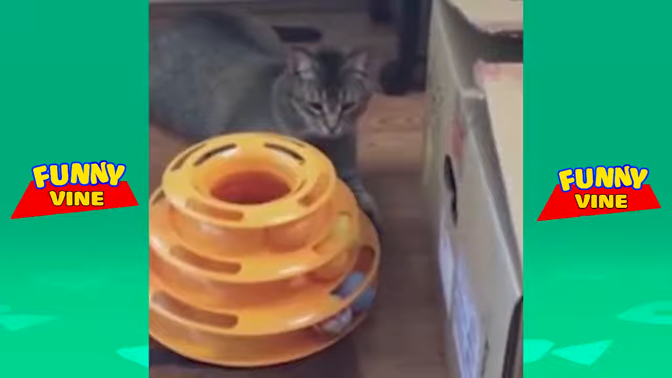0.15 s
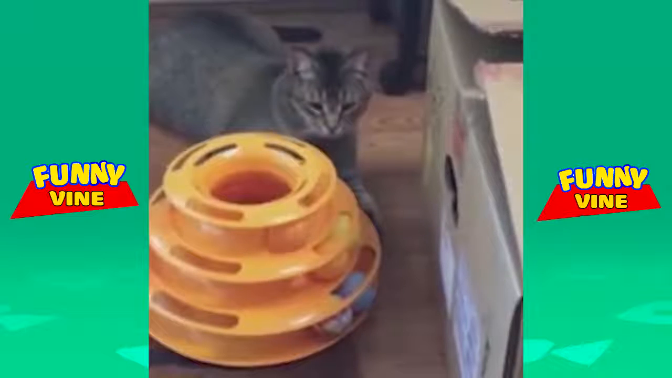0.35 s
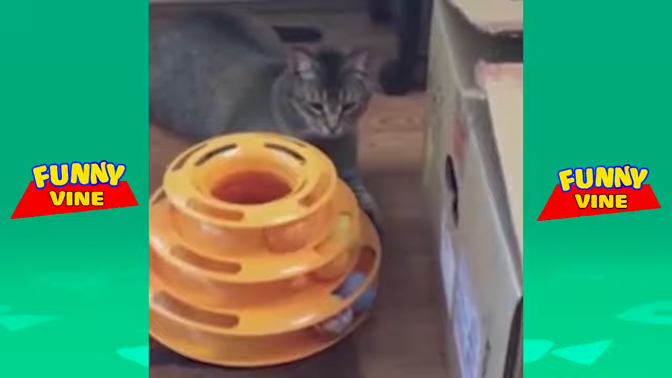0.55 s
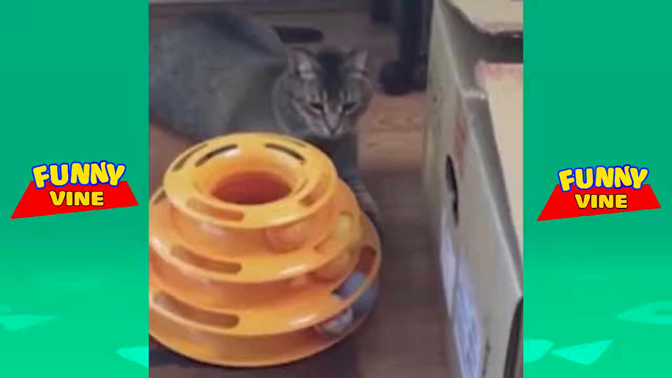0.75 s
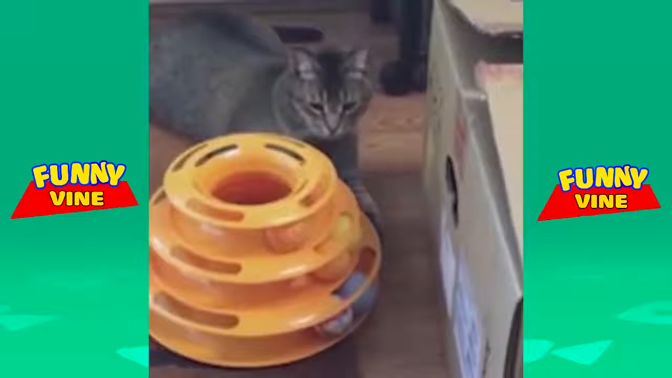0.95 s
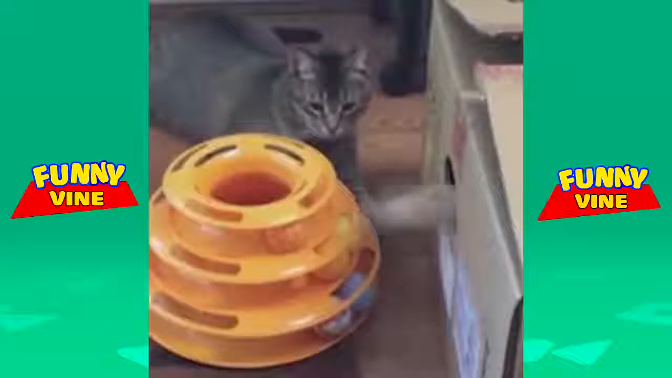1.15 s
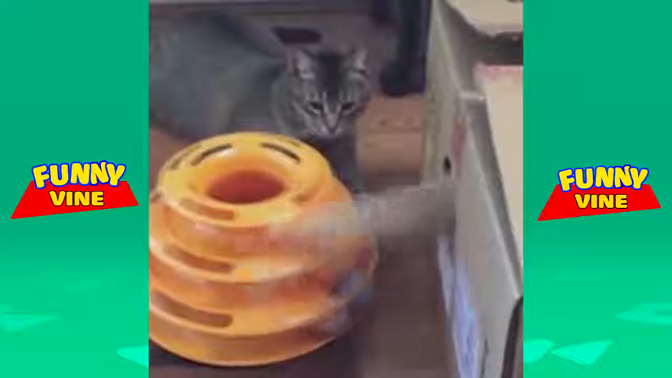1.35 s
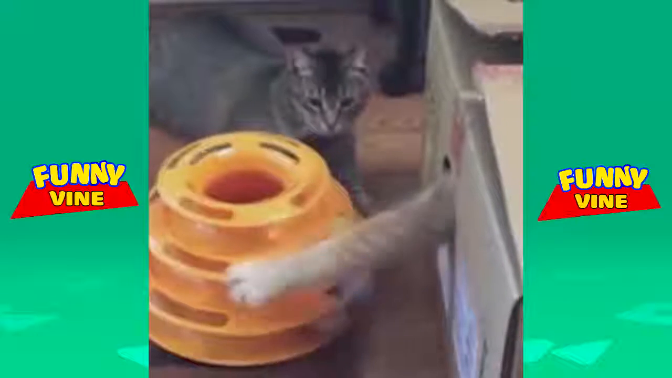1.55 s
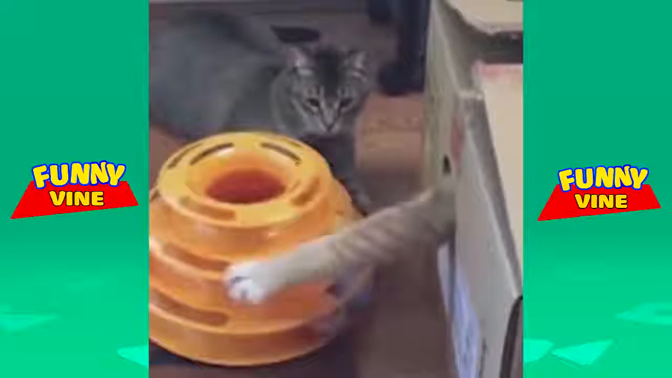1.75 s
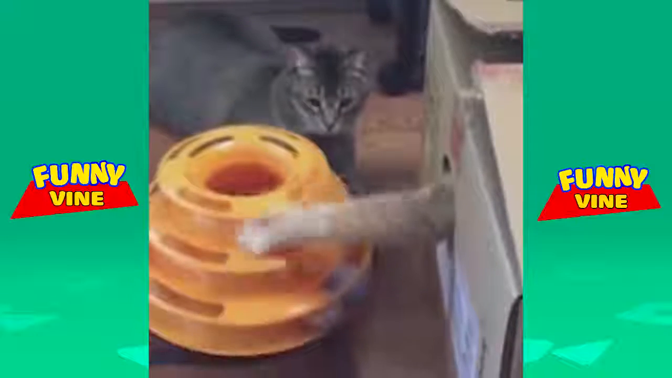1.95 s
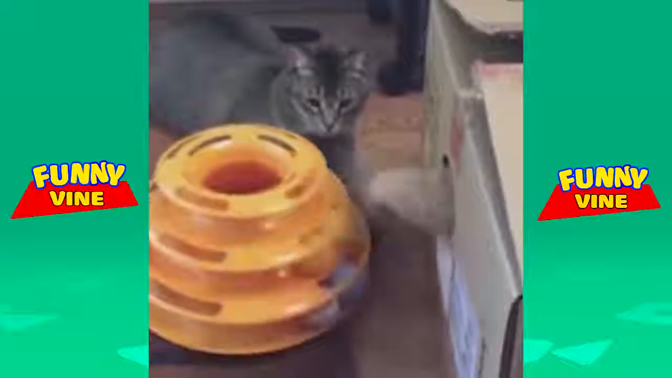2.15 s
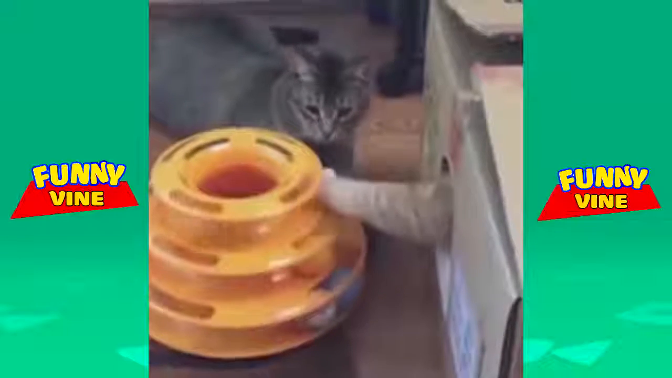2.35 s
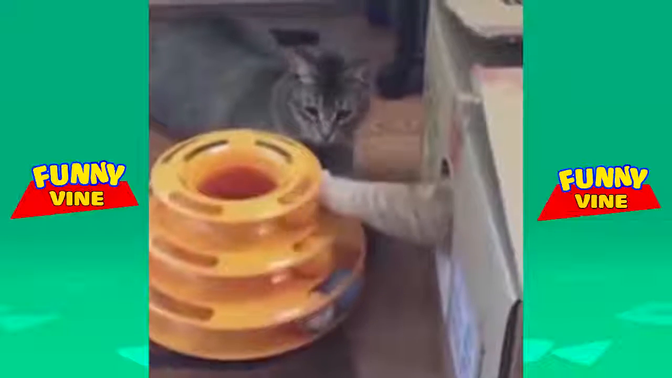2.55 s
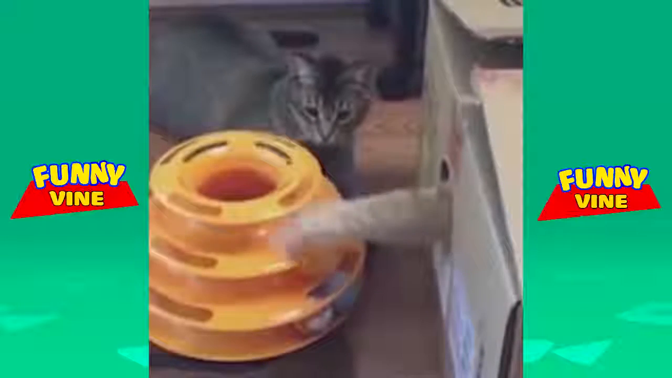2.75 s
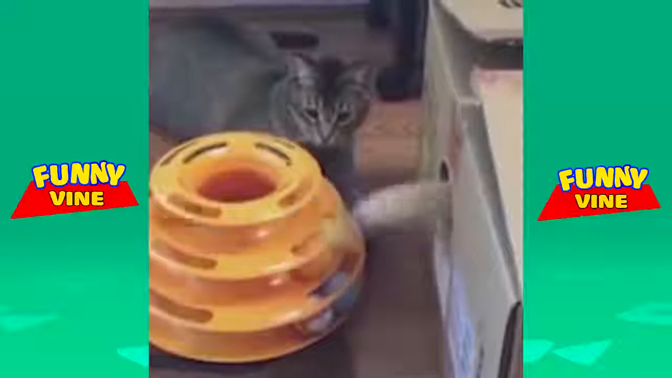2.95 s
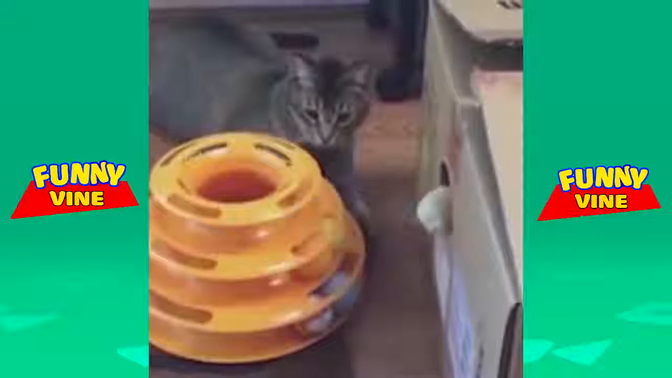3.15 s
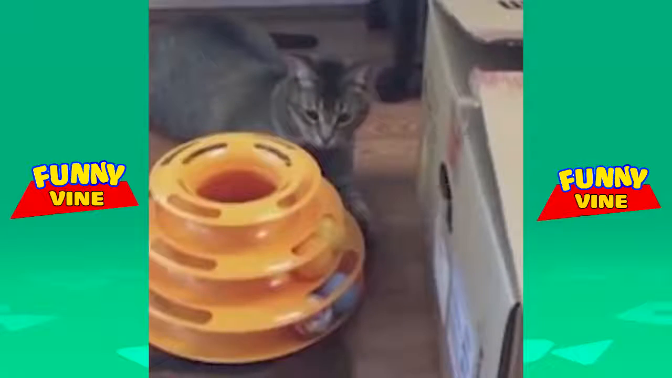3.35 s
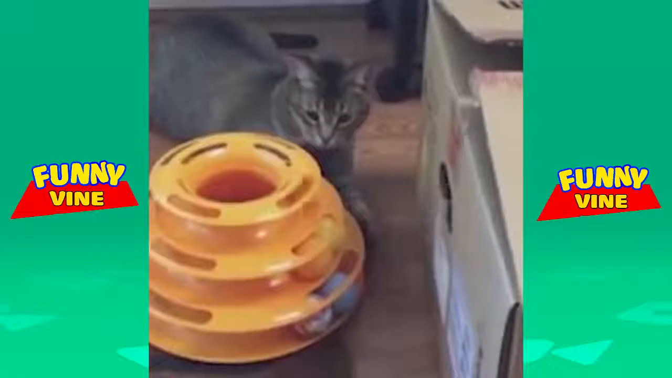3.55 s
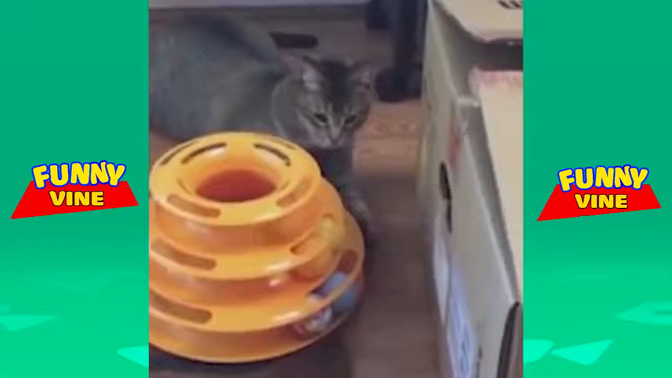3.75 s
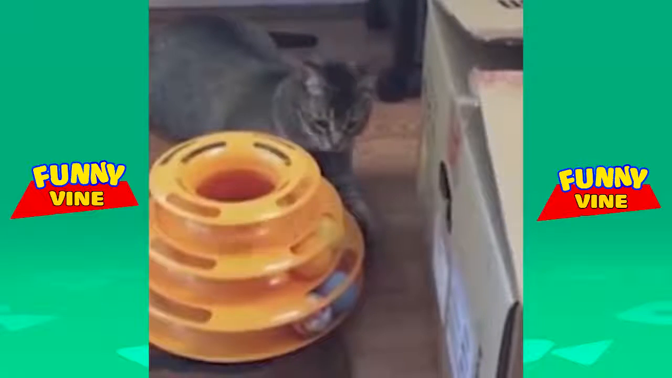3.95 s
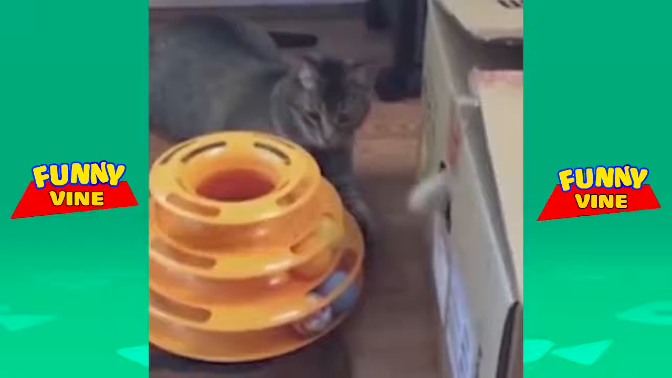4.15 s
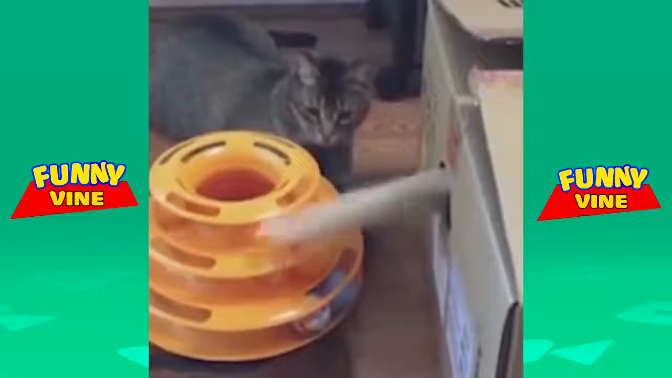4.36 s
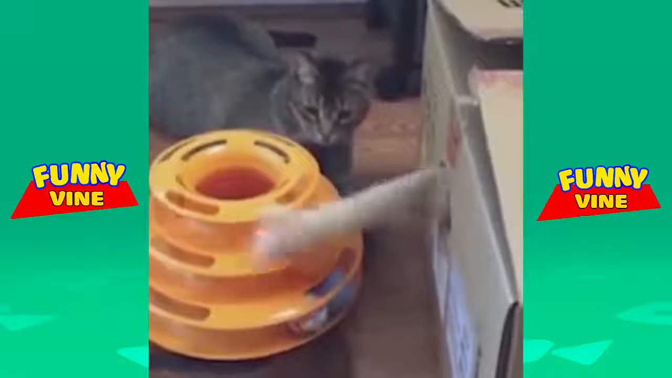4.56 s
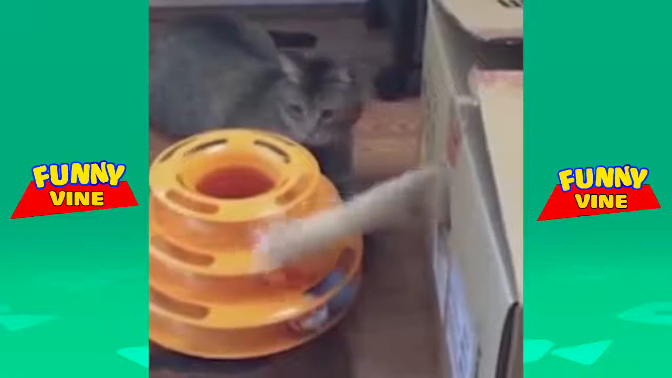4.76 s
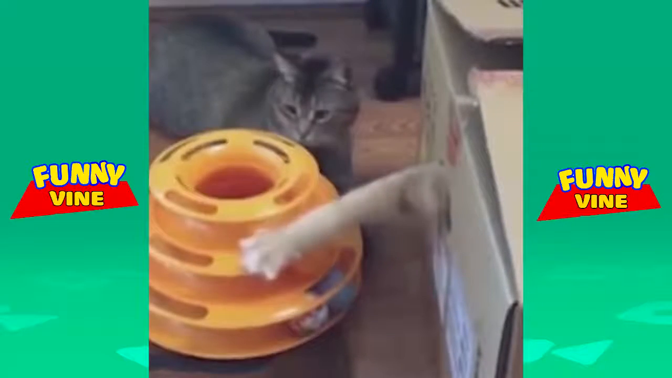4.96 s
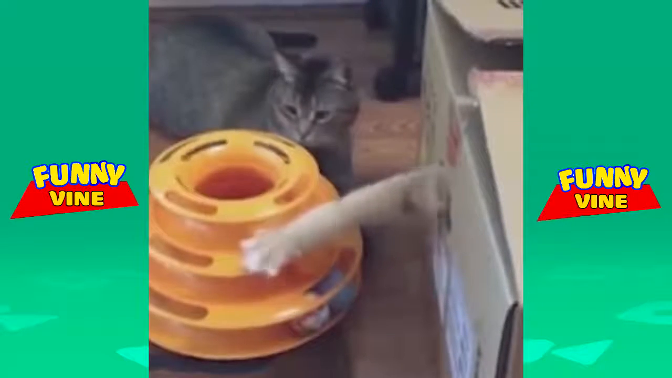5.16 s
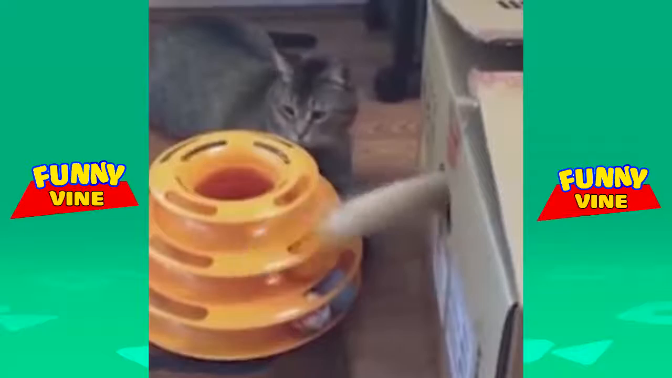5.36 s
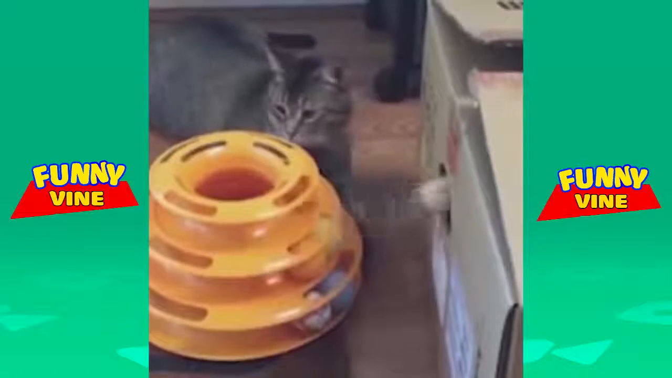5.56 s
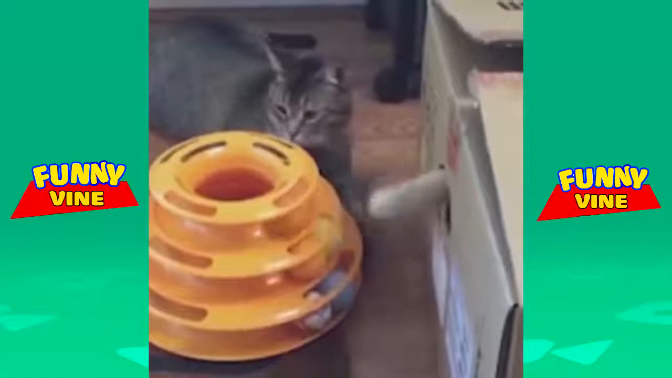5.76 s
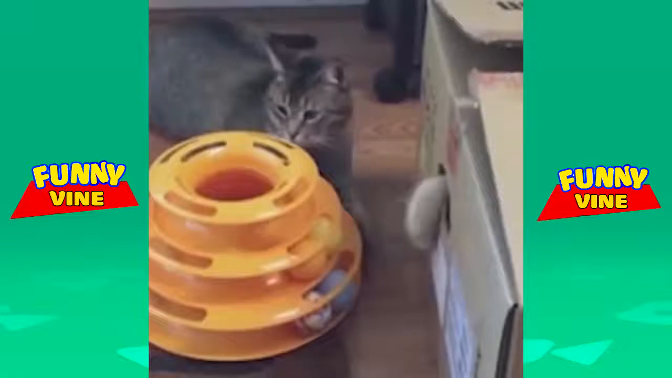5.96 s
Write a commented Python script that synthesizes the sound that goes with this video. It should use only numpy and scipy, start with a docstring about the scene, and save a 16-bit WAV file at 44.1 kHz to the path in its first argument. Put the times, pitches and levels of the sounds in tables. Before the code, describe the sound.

For the first 1.3 seconds there is little but soft room noise and a faint low hum, swelling slightly until about 1.0, then dropping at once; a very light brush comes near 0.75. At about 1.45 a dull thud and a sharp hollow plastic clack begin a cat's batting: balls knock and rattle in their tracks, with claw skids near 1.7. Knocks ease around 2.1, then crowd together loudly from 2.25 to 2.65. Another cluster comes at 2.9 to 3.0, followed by rolling, scrapes near 3.3 and a clack at 3.63. Faint ticks and rolling fill 3.8 to 4.4. A second bout starts at 4.5, strong to 4.65, with scuffs and thuds, thinning through 5.4. Quiet fur brushing and claw scratches follow at 5.55 to 6.0, and a final clear knock lands near 6.08. Close phone pickup, small echoing room.

```python
"""Small room, wooden floor: a cat's paw shoots out of a cardboard box and bats a plastic tower of ring tracks.
Hollow balls knock and roll (modal track and shell, driven by random contacts); claws skid on the plastic.
Tower and box thud (damped modes) and shift on the boards (resonant scuffs); fur brushes (grainy band hiss).
Room echoes, shaped noise and a faint appliance hum lie behind; a phone a step away narrows the band."""
import sys
import numpy as np
from scipy import signal
from scipy.fft import rfft, irfft
from scipy.io import wavfile
from scipy.ndimage import uniform_filter1d

SR = 44100
rng = np.random.default_rng(int(sys.argv[2]) if len(sys.argv) > 2 else 0)


def wav_record(signal):
    """Record a signal, one row per channel, as 16-bit PCM in the file named by sys.argv[1]."""
    frames = np.transpose(np.atleast_2d(signal))
    bounded = np.clip(frames, -1, 1)
    # unit amplitude maps onto the largest positive 16-bit level
    quanta = np.round(bounded * 32767).astype(np.int16)
    wavfile.write(sys.argv[1], SR, quanta)


N = 268774

# Knocks of balls and claws, dry peaks: [t/s, track/dB, shell/dB, crack/dB, favoured track f/Hz, favoured shell f/Hz]
KNOCK_EVENTS = [(1.456, -24, -43, -43, 388, 1760), (1.474, -32, -31, -37, 587, 2960),
                (1.500, -9.5, -14, -22.5, 680, 1850), (1.513, -31, -34, -47, 725, 1800),
                (1.530, -30, -40, -49, 600, 1800), (1.567, -38, -22, -18, 662, 2280),
                (1.615, -19, -19.5, -27, 1110, 1740), (1.72, -32, -18, -24, 630, 1810),
                (1.739, -21, -20, -31, 704, 1850), (1.767, -23, -20, -40, 630, 1720),
                (1.773, -29, -25, -43, 420, 3400), (1.783, -27, -36, -50, 400, 1800),
                (1.833, -31, -21, -32, 1190, 1570), (1.877, -53, -16, -37, 630, 1670),
                (1.894, -45, -19, -44, 600, 2980), (1.909, -24.5, -16, -45, 600, 1640),
                (1.940, -21.5, -18.5, -49, 643, 2640), (2.036, -27, -31, -50, 646, 2700),
                (2.078, -33, -50, -54, 655, 1800), (2.117, -40, -36.5, -60, 637, 3130),
                (2.166, -31.5, -48, -51, 780, 1650), (2.187, -23.5, -18.5, -60, 590, 1800),
                (2.263, -43, -23, -23, 1200, 1870), (2.276, -30, -8.5, -31, 530, 2000),
                (2.288, -16.5, -23, -23.5, 520, 1800), (2.305, -19, -29, -29, 586, 1510),
                (2.316, -14, -12, -40, 570, 3220), (2.330, -29, -34, -47, 607, 1910),
                (2.352, -24, -19.5, -32, 640, 2170), (2.412, -40, -15.5, -33, 1170, 1700),
                (2.425, -13, -12, -19.5, 840, 1500), (2.434, -15.5, -14, -37, 580, 1570),
                (2.449, -39, -13.5, -27.5, 537, 2270), (2.479, -25.5, -21, -35, 407, 1700),
                (2.595, -30, -31, -50, 620, 3500), (2.605, -47, -28, -39, 616, 1980),
                (2.62, -47, -15, -46, 616, 3630), (2.627, -18, -16, -52, 724, 1560),
                (2.67, -30, -25.5, -55, 520, 3330), (2.865, -30, -59, -50, 730, 1510),
                (2.909, -55, -32, -43, 600, 3300), (2.92, -17.5, -14.5, -31, 1060, 2980),
                (2.947, -42, -20, -30, 1140, 2030), (2.986, -15.5, -13, -26, 890, 1900),
                (3.009, -23.5, -13.5, -55, 523, 1620), (3.035, -35, -29, -53, 420, 1800),
                (3.129, -48, -34, -46, 623, 1400), (3.168, -41, -34.5, -53, 620, 1900),
                (3.186, -38, -38, -48, 850, 1800), (3.245, -37, -43, -45, 627, 2000),
                (3.329, -24.5, -28, -35, 690, 1770), (3.365, -33, -32, -44, 617, 1850),
                (3.631, -53, -13, -28, 685, 1700), (3.802, -36, -24.5, -35.5, 1210, 2800),
                (3.809, -40, -29, -50, 1270, 2090), (3.818, -36, -30, -56, 1210, 2980),
                (3.934, -34, -38.5, -60, 615, 1850), (3.96, -32, -36, -73, 620, 1730),
                (4.016, -36.5, -45, -71.5, 524, 1730), (4.09, -37, -52, -73, 625, 1330),
                (4.121, -34, -46, -62, 595, 1310), (4.37, -35, -45, -69, 464, 1650),
                (4.499, -14, -17.5, -30.5, 684, 2140), (4.52, -26, -40, -50, 372, 1800),
                (4.564, -17, -21, -28, 726, 1790), (4.571, -39, -12, -45, 727, 1750),
                (4.577, -24, -14, -47, 504, 1830), (4.592, -36, -29, -41, 700, 2900),
                (4.617, -34, -26, -46, 625, 1800), (4.642, -20.5, -30, -30, 760, 1810),
                (4.709, -26, -40, -32, 710, 1690), (4.787, -27, -39, -45, 690, 1800),
                (4.816, -36, -18, -32.5, 708, 2180), (4.903, -32, -39, -60, 617, 1900),
                (4.929, -51, -27, -48, 625, 3100), (4.956, -28.5, -39, -56, 630, 1750),
                (4.967, -37, -25.5, -28, 650, 1750), (4.991, -26, -16, -35, 680, 1980),
                (5.008, -55, -39, -52, 650, 2150), (5.032, -55, -24.5, -58, 630, 1780),
                (5.063, -28, -48, -63, 597, 1780), (5.129, -26.5, -30, -59, 1020, 1820),
                (5.14, -29, -39, -61, 515, 1330), (5.159, -49, -36, -60, 603, 1840),
                (5.192, -26, -30, -29.5, 494, 1820), (5.205, -29.5, -36, -55, 520, 1750),
                (5.216, -46, -44, -53, 610, 1750), (5.242, -44, -57, -45, 406, 2360),
                (5.3, -38.5, -45, -68, 600, 1700), (5.382, -24.5, -43, -68, 392, 1350),
                (5.389, -32, -34, -68, 400, 1320), (5.4, -32, -30.5, -60, 1220, 1760),
                (5.411, -38, -43, -64, 585, 1350), (5.842, -43, -46, -48, 706, 1980),
                (6.027, -38.5, -47, -60, 1092, 1305), (6.076, -18, -23, -35, 690, 1940)]
# Claws skidding on plastic, dry peaks: [t/s, track/dB, shell/dB, crack/dB, favoured track f/Hz, favoured shell f/Hz]
SKID_EVENTS = [(1.676, -23, -31, -47, 635, 1750), (1.734, -23, -16.5, -21, 710, 2000),
               (2.597, -23.5, -18.5, -51, 686, 2160), (3.237, -32, -33.5, -31, 704, 2000),
               (3.321, -32, -33, -41, 695, 1690), (3.617, -28.5, -23, -31, 625, 2880),
               (4.765, -21.5, -24.5, -29, 678, 1940), (5.555, -37, -43.5, -58, 614, 1300),
               (5.693, -45, -60, -45, 704, 2860), (5.770, -41.5, -32, -45, 690, 1920),
               (5.836, -34.5, -41, -36.5, 720, 1950), (5.875, -35, -28, -36, 685, 2830),
               (5.885, -32.5, -24.5, -29.5, 700, 1990), (5.98, -65.5, -75, -38.5, 672, 1800),
               (6.067, -25, -53, -32, 700, 1300)]
# Runs of a shoved ball: [start t/s, free run/s, track level/dB, shell level/dB]
ROLL_EVENTS = [(1.575, 0.04, -36, -40), (1.62, 0.027, -45, -47), (1.76, 0.022, -37, -30),
               (1.95, 0.36, -55, -48), (2.31, 0.11, -56, -30), (2.45, 0.012, -55, -34.5),
               (2.541, 0.14, -44, -39.5), (2.9, .5, -46, -49.5), (3.43, 0.33, -48.5, -55.5),
               (3.849, 0.55, -54.5, -74), (4.44, 0.027, -46.5, -53), (4.64, 0.11, -43, -41),
               (4.82, 0.34, -53, -53), (5.18, 0.01, -43.5, -49), (5.35, 0.3, -54.5, -62.5),
               (5.74, 0.091, -52.5, -48.5), (5.87, 0.016, -61, -48), (5.92, 0.067, -71, -61),
               (6.08, 0.039, -39.5, -70)]
# Thuds of tower and box, dry peaks: [t/s, level/dB, nominal f/Hz, t60/s]
THUD_EVENTS = [(1.408, -56, 243, 0.031), (1.463, -19, 183, 0.076), (1.485, -28.5, 169, 0.097),
               (2.191, -36.5, 149, 0.21), (2.286, -24.5, 214, 0.022), (2.415, -27.5, 153, 0.043),
               (2.579, -24, 157, 0.15), (2.881, -51, 139.4, 0.12), (2.963, -45, 166, 0.11),
               (3.067, -31.5, 154, 0.082), (3.328, -29.5, 203, 0.091), (3.646, -33.5, 136, 0.14),
               (3.809, -37.5, 169, 0.14), (4.441, -29, 182, 0.21), (4.57, -25.5, 243.5, 0.2),
               (4.643, -22.5, 177, 0.07), (4.734, -33.5, 162, 0.096), (4.97, -23.5, 169, 0.066),
               (5.176, -32, 162, 0.061), (5.365, -35.5, 321, 0.095), (5.568, -38.5, 148, 0.11),
               (5.794, -36, 179, 0.1), (6.034, -28.5, 171, 0.046)]
# Strokes of fur and claws: [loudest t/s, relative level/dB, swell/s, hold/s, tilt/(dB per octave)]
BRUSH_STROKES = [(0.76, -53, 0.012, 0.0048, 3), (1.336, -49, 0.015, 0.018, 1.5),
                 (1.478, -39.5, 0.0077, 0.013, -5.5), (1.5, -49, 0.016, 0.0071, -15),
                 (1.53, -45, .03, 0.033, -7), (1.568, -37.5, 0.0065, 0.06, -4.5),
                 (1.69, -36, 0.018, 0.042, 0), (1.749, -37.5, 0.06, 0.022, -13.5),
                 (1.88, -41.5, 0.074, 0.054, 5), (2.2, -53, 0.041, 0.055, -7),
                 (2.264, -38, 0.011, 0.044, -8), (2.38, -45, 0.057, 0.027, -2),
                 (2.413, -40, 0.014, .01, 24), (2.427, -43, 0.013, 0.0073, 26),
                 (2.47, -44, 0.081, 0.065, -10.5), (2.609, -45, 0.071, 0.044, -9),
                 (2.72, -71, .05, .17, 19), (2.922, -47.5, 0.013, 0.0041, 40),
                 (2.947, -47.5, 0.024, 0.014, -15), (2.987, -41.5, 0.0088, 0.012, 22),
                 (3.08, -46, 0.036, 0.14, 7), (3.244, -38, 0.072, 0.029, 5),
                 (3.326, -35.5, 0.03, 0.0042, 1.5), (3.38, -48, 0.054, 0.16, 1.5),
                 (3.626, -49, 0.019, 0.0067, -14), (3.804, -50.5, 0.039, 0.0084, -2),
                 (4.38, -56, 0.057, .05, 5), (4.45, -40.5, 0.015, 0.016, 4.5),
                 (4.502, -45, 0.017, 0.0042, 4), (4.567, -43, 0.02, 0.017, -14),
                 (4.645, -45.5, 0.066, 0.1, 0), (4.74, -36.5, 0.13, 0.048, -0.5),
                 (4.85, -69, .05, 0.12, -18), (4.966, -51.5, 0.063, 0.01, -11.5),
                 (4.992, -52.5, 0.024, 0.011, -18.5), (5.135, -59, 0.099, 0.045, -1),
                 (5.195, -46.5, 0.041, 0.011, 3), (5.27, -58.5, .05, 0.055, 7), (5.39, -64.5, .06, .15, 6),
                 (5.567, -46.5, 0.021, 0.11, 3), (5.7, -41.5, 0.02, 0.22, 2.5),
                 (5.889, -48.5, 0.058, 0.0032, -5), (5.998, -64, .03, 0.0044, -8),
                 (6.072, -40.5, 0.031, 0.0044, 4)]
# Jolts of tower base and box on the boards: [t/s, level/dB]
SHIFT_JOLTS = [(1.54, -36.5), (1.61, -47), (1.7, -39), (2.2, -50), (2.37, -43), (2.53, -43), (3.05, -47),
               (3.15, -48.5), (3.27, -44.5), (3.5, -63), (3.65, -48), (3.78, -44.5), (3.95, -60),
               (4.1, -52), (4.35, -57), (4.469, -38.5), (4.64, -33), (5.05, -50), (5.25, -56), (5.6, -49),
               (5.75, -49), (5.85, -45)]
# Hollow track modes: [nominal f/Hz, relative level/dB, t60/s when struck]
TRACK_MODES = [(384, -3, 0.12), (404.7, -1.5, 0.18), (454, -5, 0.14), (518, 0, 0.21), (590, 0.5, 0.049),
               (629, 4.5, 0.071), (699.4, 8.5, 0.074), (801, -5, 0.076), (856, 4, 0.071), (945.6, 2, 0.13),
               (1110, 9, 0.033), (1177, 3, 0.089)]
# Ball shell modes: [nominal f/Hz, relative level/dB, t60/s when struck]
SHELL_MODES = [(1303, 0.5, 0.039), (1472, -2, 0.037), (1730, 0.5, 0.035), (1815, 1.5, 0.032),
               (1959, 6.5, 0.02), (2187, 2.5, 0.042), (2606, -4.5, 0.026), (2770, 7.5, 0.0074),
               (3280, 6.5, 0.016), (3550, -12, 0.02), (4560, -6, 0.0088), (5214, -13, 0.012)]
# Low resonances of boards and box: [f/Hz, width/Hz, relative level/dB]
BOARD_BANDS = [(64.6, 39, -18), (95, 50, -25.5), (126, 14.5, 10.5), (159, 35, 10), (205, 34, -11),
               (233, 8.3, -3)]
# Broad resonances of brush hiss and contact crack: [f/Hz, width/Hz, relative level/dB]
FUR_BANDS = [(2825, 860, 4), (4120, 870, -1.5), (5640, 1300, -1.5), (6430, 2600, -6.5), (8510, 810, -7),
             (10400, 4300, -21), (12200, 1200, -39)]
# Mean room noise level; dips briefly, swells, drops at once: [t/s, level/dB]
AIR_LEVELS = [(0, -56), (.07, -64), (.095, -73), (.12, -61.5), (.6, -60.5), (.82, -56.5), (.9, -53.5),
              (1.015, -52.5), (1.022, -66.5), (1.4, -58.5), (1.5, -54), (6.1, -57.5)]
# Room noise spectrum shape: [f/Hz, relative level/dB]
AIR_SPECTRUM = [(15, -60), (25, -2), (71, -2), (118, -3), (150, -4), (202, -19), (335, -14.5), (515, -22),
                (604, -17.5), (1390, -21.5), (1860, -22), (2180, -27.5), (12100, -39.5), (15000, -64)]
# Hum harmonics: [multiple of the hum pitch, relative level/dB]
HUM_HARMONICS = [(1, -68), (2, -73.5), (3, -80.5), (4, -75)]

KNOCK_SWELL_MS, KNOCK_CHATTER_MS, SKID_SWELL_MS, SKID_CHATTER_MS = 0.84, 14.5, 10.14, 8.2
SECOND_TOUCH_MS = 1.296  # longest-to-shortest gap is 1.5 to 0.5 of this
WAVER_RATIO, WAVER_HZ = .04, 16  # spread of pitch waver; median rate
ROLL_RISE_DB_S, ROLL_STOP_DB_S = 235, 118
TRACK_SAG_DB_S, SHELL_SAG_DB_S = 2, 16.5  # a slowing ball loses its shell tone first
BRUSH_SWELL_DB, BRUSH_SAG_DB_S, BRUSH_LIFT_DB_S = 15.5, 42, 331
SHIFT_RISE_DB_S, SHIFT_SETTLE_DB_S = 163, 74
HUM_START_HZ, HUM_SAG_HZ_S = 82.8, .7
ROOM_DB, ROOM_T60_S, ROOM_TREBLE_T60_S = -8, 0.37, 0.26
PHONE_TOP_HZ = 15600


def knocks():
    """A double blow, then sparse rebounds."""
    return clatter(KNOCK_EVENTS, 1, 0.18, KNOCK_SWELL_MS, KNOCK_CHATTER_MS, density=.05)


def skids():
    """Claws catch and slip: a denser chatter without the blow, swelling before it fades."""
    return clatter(SKID_EVENTS, 0, 0.54, SKID_SWELL_MS, SKID_CHATTER_MS, density=0.18)


def clatter(events, blow, rebound, swell_ms, chatter_ms, density):
    """Contacts ring the ball shell and, with a longer push, the track; they also crack directly."""
    out, ms = np.zeros(N), 1000 * np.arange(SR // 7) / SR
    shape = np.minimum(ms / swell_ms, 1) ** 2 * np.exp(-np.maximum(ms - swell_ms, 0) / chatter_ms)
    for s, track_db, shell_db, crack_db, track_hz, shell_hz in events:
        touches = rng.standard_normal(len(ms)) * (rng.random(len(ms)) < density)
        push = rebound * shape * touches
        push[0] = 0.49 * blow
        gap_ms = SECOND_TOUCH_MS * (.5 + rng.random())
        push[int(SR * gap_ms / 1000)] += blow
        scrape = shape * rng.standard_normal(len(ms))
        crack = bands(1.04 * push + 0.14 * scrape, FUR_BANDS)
        track = struck(soften(push, 0.78), TRACK_MODES, track_hz, focus_db=19.0, detune=0.017, spread_db=4.5)
        shell = struck(soften(push, 0.24), SHELL_MODES, shell_hz, focus_db=12.5, detune=0.06, spread_db=5.0)
        crack = crack / np.abs(crack).max()
        add(out, s, undb(track_db) * track + undb(shell_db) * shell + undb(crack_db) * crack)
    return out


def struck(push, modes, spot_hz, focus_db, detune, spread_db):
    """The spot struck favours modes near one pitch; pitch and share vary per blow and waver as the ball moves on."""
    chance = rng.standard_normal((len(modes), 4))
    t, y = np.arange(len(push)) / SR, 0
    for (hz, db, t60_s), (share, offset, depth, pace) in zip(modes, chance):
        octaves = abs(np.log2(hz / spot_hz))
        waver = WAVER_RATIO * depth * np.sin(2 * np.pi * WAVER_HZ * undb(3 * pace) * t)
        pitch_hz = hz * (1 + detune * offset * min(0.27 + 3 * octaves, 1.5) + waver)
        mode_db = db - focus_db * octaves + spread_db * share
        y = y + undb(mode_db) * gliding_ring(push, pitch_hz, t60_s)
    return y / np.abs(y).max()


def rolling():
    """Seams and dust under the balls tick into track and shell; pitches and shares wander as the balls travel."""
    s, run_s, track_db, shell_db = np.transpose(ROLL_EVENTS)
    grit = ticks(1100, scatter_db=2.8) * undb(2.5 * walk(40))
    track = rattle(grit, TRACK_MODES, 0.7, 0.36)
    shell = rattle(grit, SHELL_MODES, 0.4, 0.55)
    track_power = swells(s, track_db, ROLL_RISE_DB_S, run_s, TRACK_SAG_DB_S, ROLL_STOP_DB_S)
    shell_power = swells(s, shell_db, ROLL_RISE_DB_S, run_s, SHELL_SAG_DB_S, ROLL_STOP_DB_S)
    return gain(track_power) * track + gain(shell_power) * shell


def rattle(grit, modes, contact_ms, evenness):
    """Steady ticks ring shorter modes; evenness (below 1) moderates the stretched level contrast."""
    push = soften(grit, contact_ms)
    t60_ratio, drift, flicker_db, wander_db = .45, .045, 4.5, 3
    y = 0
    for hz, db, t60_s in modes:
        mode_db = (2.0 - evenness) * db + flicker_db * walk(30) + wander_db * walk(6.6)
        y = y + undb(mode_db) * gliding_ring(push, hz * (1 + drift * walk(12)), t60_ratio * t60_s)
    return unit(y)


def thuds():
    """A soft paw pushes for one cycle; the panel and a far weaker overtone ring out."""
    out = np.zeros(N)
    for s, db, hz, t60_s in THUD_EVENTS:
        push = soften(np.eye(1, SR // 3)[0], 1000 / hz)
        modes = [(hz, 0, t60_s), (7.2 * hz, -3, 0.92 * t60_s)]
        add(out, s, undb(db) * struck(push, modes, hz, focus_db=32.0, detune=0.018, spread_db=2.0))
    return out


def brushing():
    """Very many hairs slip at once: grainy hiss, flickering in colour; the loudest stroke dominates its tilt."""
    s, db, swell_s, held_s, tilt_db = np.transpose(BRUSH_STROKES)
    rise_db_s = BRUSH_SWELL_DB / np.maximum(swell_s, .002)[:, None]
    power = swells(s, db, rise_db_s, held_s, BRUSH_SAG_DB_S, BRUSH_LIFT_DB_S)
    bright_db = per_sample(tilt_db @ power / power.sum(axis=0))
    hiss = 0
    for band in FUR_BANDS:
        colour_db = bright_db * np.log2(band[0] / 6000) + 5.2 * walk(30)
        hairs = unit(ticks(6000, scatter_db=2.5))
        hiss = hiss + undb(colour_db) * bands(hairs, [band])
    return gain(power) * undb(0.92 * walk(90)) * hiss


def shifting():
    """Uneven scuffing shakes the low resonances of boards and box."""
    s, db = np.transpose(SHIFT_JOLTS)
    scuffs = soften(ticks(250, scatter_db=1.5), 3)
    level = gain(swells(s, db, SHIFT_RISE_DB_S, 0 * s, 0, SHIFT_SETTLE_DB_S))
    rumble = sum(undb(2.2 * walk(10)) * bands(scuffs, [band]) for band in BOARD_BANDS)
    return level * unit(rumble)


def air():
    """Spectrally shaped room noise and a wavering, sinking hum; both follow one level curve."""
    hz, db = np.transpose(AIR_SPECTRUM)
    f = np.maximum(np.fft.rfftfreq(N, 1 / SR), 1)
    shape = undb(np.interp(np.log(f), np.log(hz), db))
    noise = unit(irfft(rfft(rng.standard_normal(N)) * shape, N))
    t = np.arange(N) / SR
    level_db = np.interp(t, *np.transpose(AIR_LEVELS))
    turns = np.cumsum(HUM_START_HZ - HUM_SAG_HZ_S * t + 0.649 * walk(8.7)) / SR
    hum = 0
    for multiple, db in HUM_HARMONICS:
        tone = np.sqrt(2) * np.sin(2 * np.pi * (multiple * turns + rng.random()))
        hum = hum + undb(db + 4.3 * walk(10)) * tone
    return undb(level_db + 1.4 * walk(36)) * noise + undb(level_db + 59.5) * hum


def room(x):
    """Dense decaying echoes; the treble dies first."""
    t = np.arange(SR // 2) / SR
    noise = rng.standard_normal(len(t))
    low = signal.sosfilt(signal.butter(2, 2000, fs=SR, output="sos"), noise)
    tail = low * undb(-60 * t / ROOM_T60_S) + (noise - low) * undb(-60 * t / ROOM_TREBLE_T60_S)
    tail *= np.clip((t - .003) / 0.0066, 0, 1)  # echoes start after 3 ms
    return x + undb(ROOM_DB) * signal.fftconvolve(x, tail / np.sqrt(np.sum(tail ** 2)))[:N]


def gliding_ring(x, hz, t60_s):
    """One decaying mode of moving pitch: the ringing is done in a frame that turns with it."""
    turn = np.exp(2j * np.pi * np.cumsum(hz) / SR)
    decay = np.exp(-np.log(1000) / (t60_s * SR))
    return (turn * signal.lfilter([1], [1, -decay], x / turn)).imag


def soften(x, contact_ms):
    """A contact that lasts a moment excites less treble."""
    return np.convolve(x, np.hanning(int(contact_ms * SR / 1000) + 2))[:len(x)]


def bands(x, table):
    """Broad resonances side by side."""
    return sum(undb(db) * signal.lfilter(*signal.iirpeak(hz, hz / width, SR), x) for hz, width, db in table)


def ticks(rate_hz, scatter_db):
    """Tiny random contacts, some larger than the rest."""
    size_db = scatter_db * np.minimum(rng.exponential(size=N), 3)
    return (rng.random(N) < rate_hz / SR) * rng.standard_normal(N) * undb(size_db)


def walk(rate_hz):
    """Random levels, one per 1 / rate_hz s, joined by slopes; spread about 0.8."""
    k = int(SR / rate_hz)
    return uniform_filter1d(np.repeat(rng.standard_normal(N // k + 1), k), k)[:N]


def swells(s, db, rise_db_s, held_s, sag_db_s, fall_db_s):
    """Power of each event on a 1 ms grid: it rises, sags while held, then falls."""
    t = np.arange(0, N / SR + .002, .001) - s[:, None]
    held = np.clip(t, 0, np.maximum(held_s, 0)[:, None])
    fallen = np.maximum(t, 0) - held
    level_db = db[:, None] + rise_db_s * np.minimum(t, 0) - sag_db_s * held - fall_db_s * fallen
    return undb(2 * level_db) + 1e-30


def gain(power):
    """Overlapping events add in power."""
    return per_sample(np.sqrt(power.sum(axis=0)))


def per_sample(x):
    """1 ms grid to samples."""
    return np.interp(np.arange(N) / SR, np.arange(len(x)) / 1000, x)


def undb(db):
    """Decibels to amplitude."""
    return 10 ** (np.asarray(db) / 20)


def unit(x):
    """Scale to rms 1."""
    return x / np.sqrt(np.mean(x ** 2))


def add(out, s, x):
    """Mix x into out from s seconds on."""
    i = int(s * SR)
    out[i:i + len(x)] += x[:N - i]


def scene():
    """Contact sounds in the room, over the air noise."""
    plastic = knocks() + skids() + rolling()
    # the thin tower radiates little below its lowest mode
    plastic = signal.sosfilt(signal.butter(6, 345, "high", fs=SR, output="sos"), plastic)
    return (room(plastic + thuds() + brushing() + shifting()) + air())[None]


def record(dry):
    """The phone drops the deepest bass, dulls the top octave and cuts above it."""
    x = signal.sosfilt(signal.butter(4, 62, "high", fs=SR, output="sos"), dry)
    x = signal.sosfilt(signal.butter(3, 13500, fs=SR, output="sos"), x)
    return signal.sosfilt(signal.ellip(10, .2, 70, PHONE_TOP_HZ, fs=SR, output="sos"), x)


dry = scene()
out = record(dry)
wav_record(out)
```